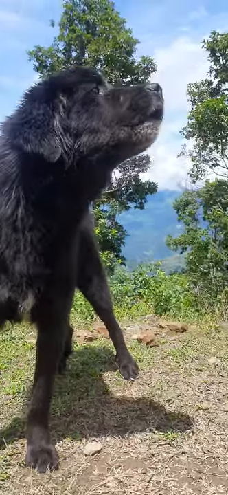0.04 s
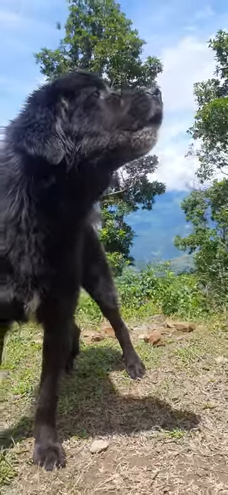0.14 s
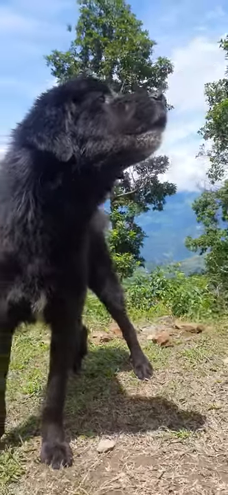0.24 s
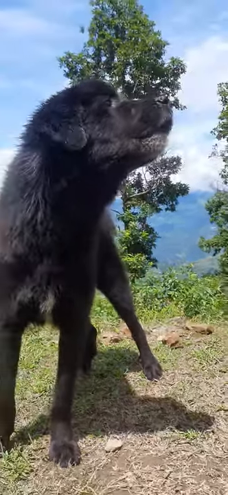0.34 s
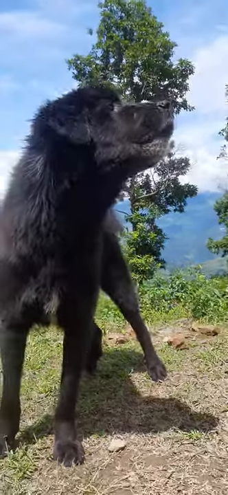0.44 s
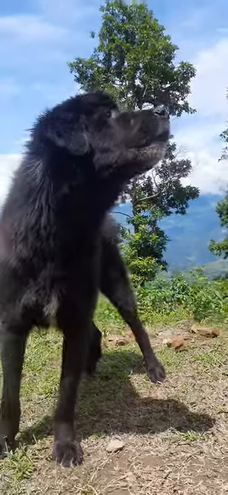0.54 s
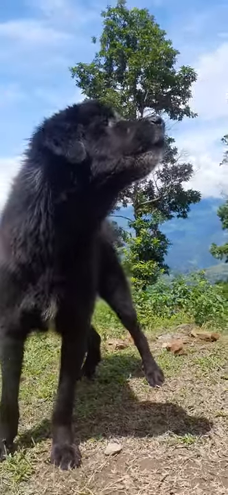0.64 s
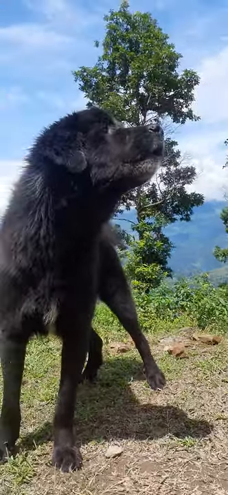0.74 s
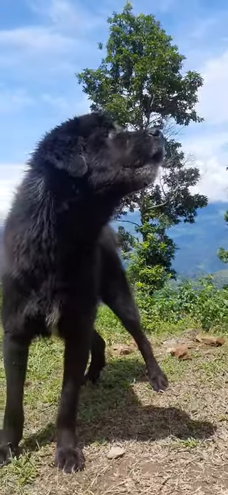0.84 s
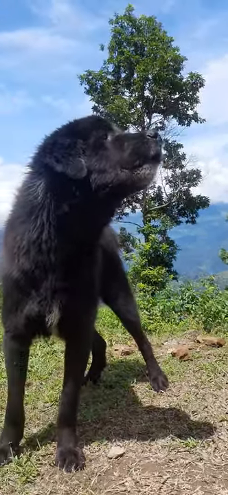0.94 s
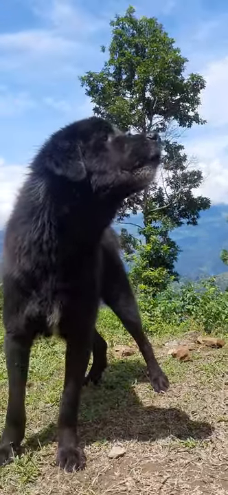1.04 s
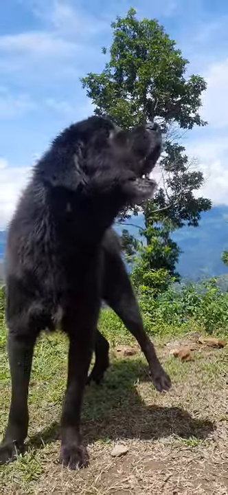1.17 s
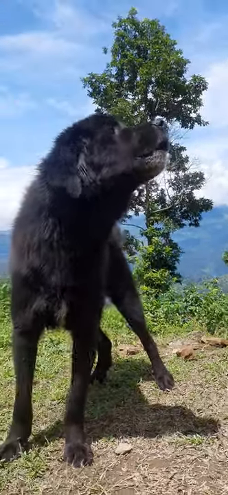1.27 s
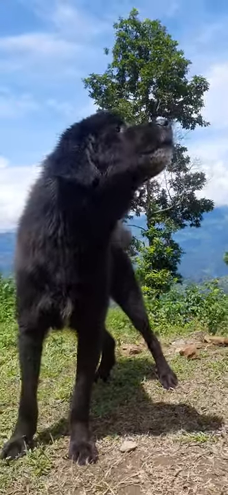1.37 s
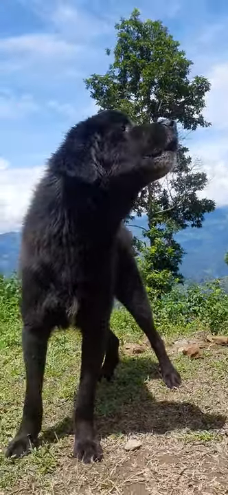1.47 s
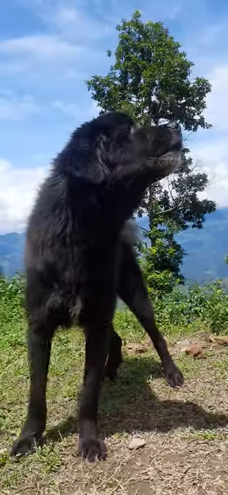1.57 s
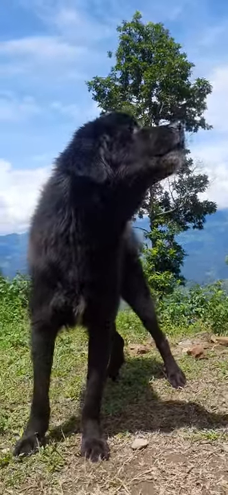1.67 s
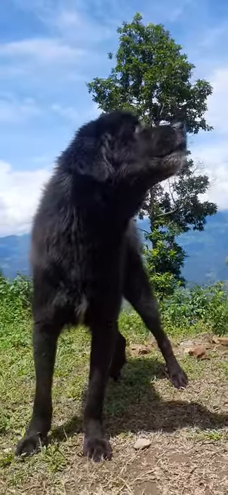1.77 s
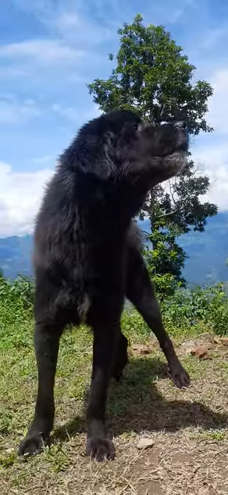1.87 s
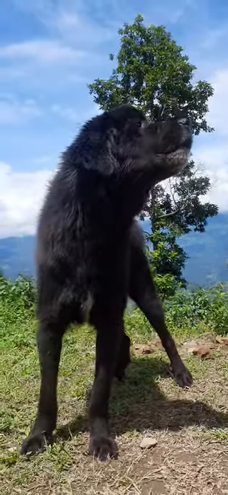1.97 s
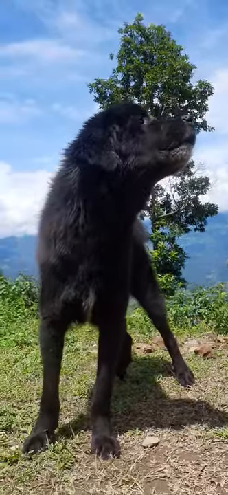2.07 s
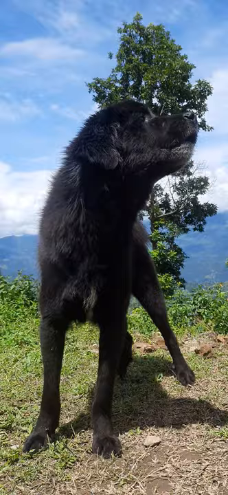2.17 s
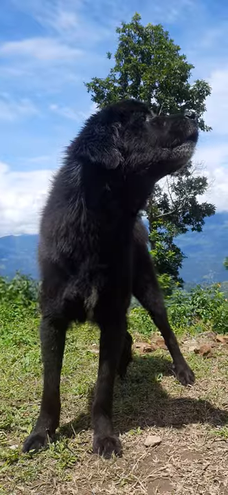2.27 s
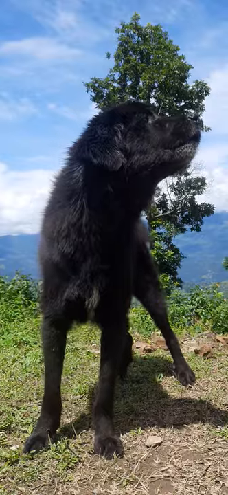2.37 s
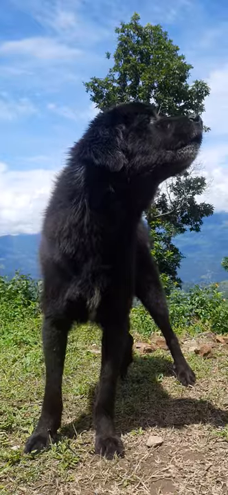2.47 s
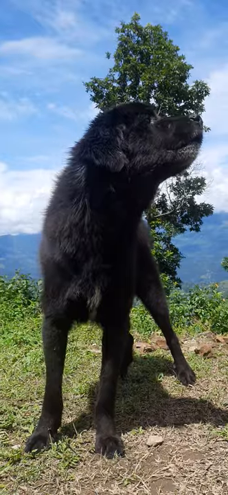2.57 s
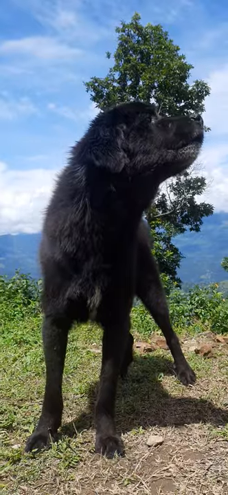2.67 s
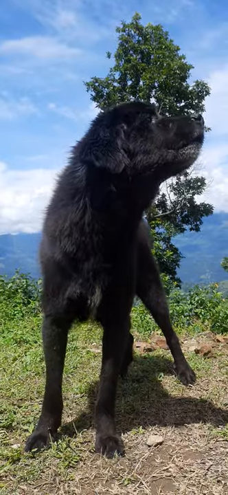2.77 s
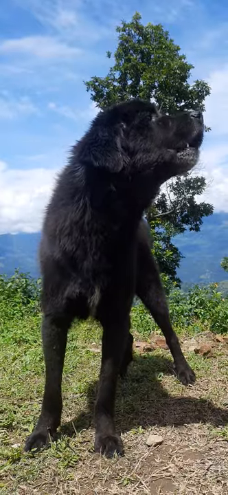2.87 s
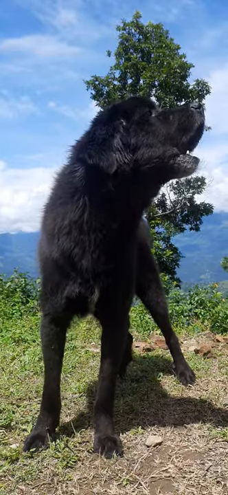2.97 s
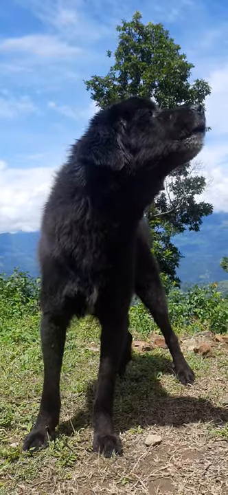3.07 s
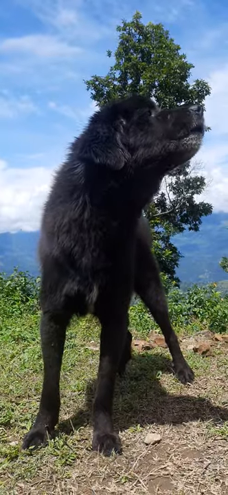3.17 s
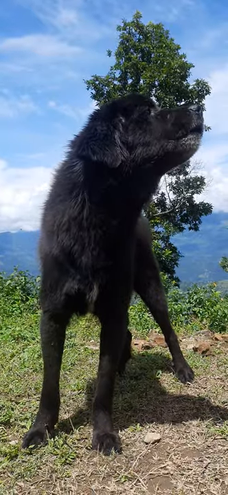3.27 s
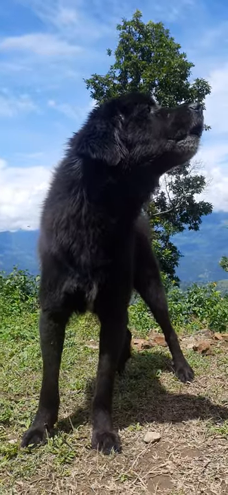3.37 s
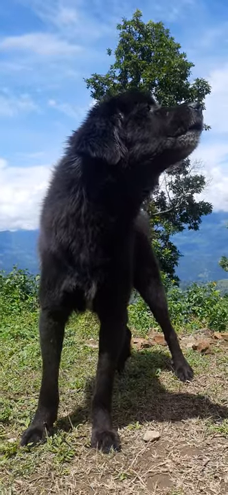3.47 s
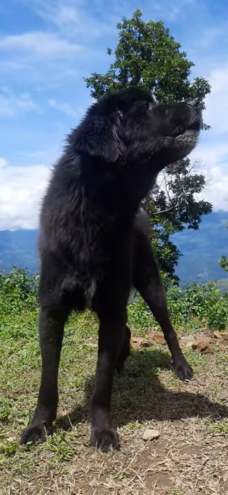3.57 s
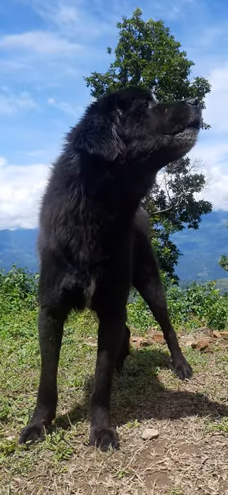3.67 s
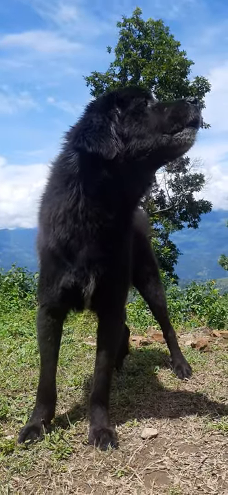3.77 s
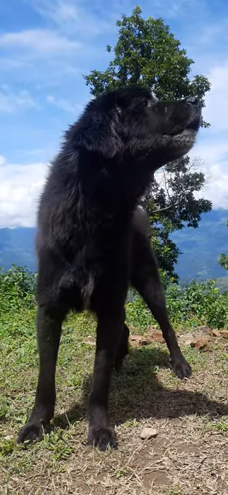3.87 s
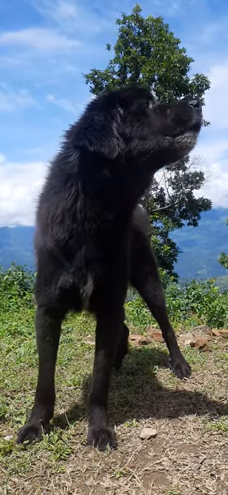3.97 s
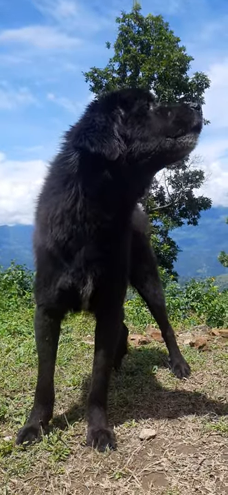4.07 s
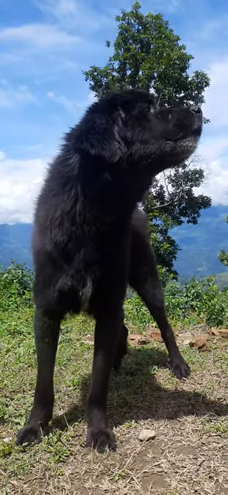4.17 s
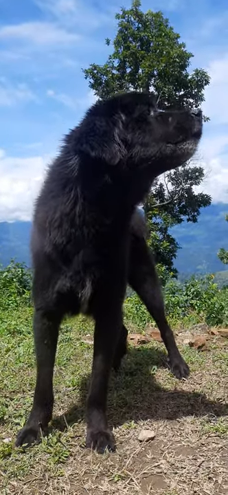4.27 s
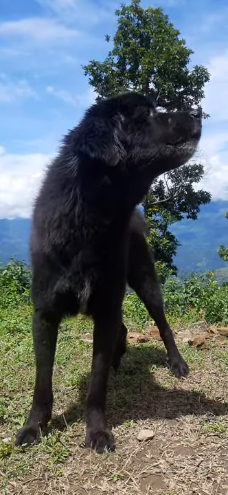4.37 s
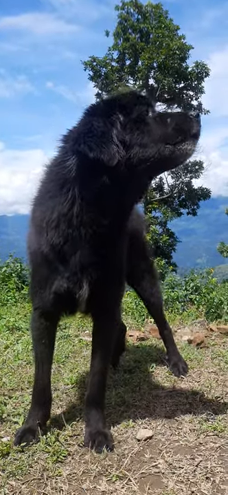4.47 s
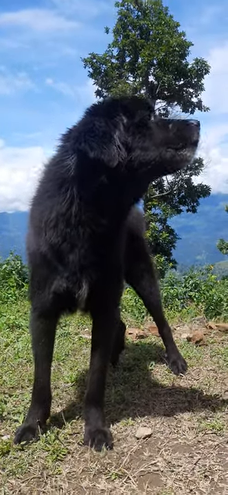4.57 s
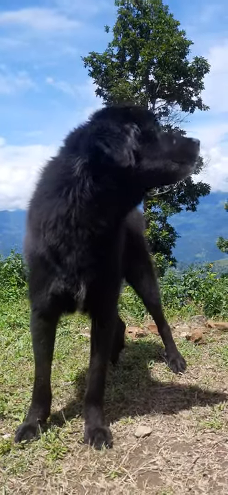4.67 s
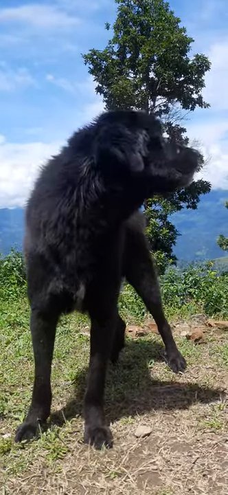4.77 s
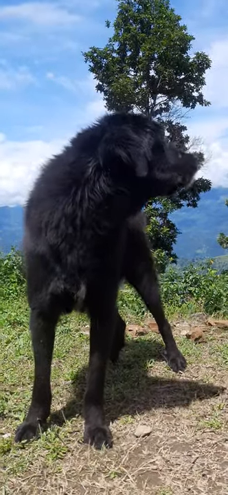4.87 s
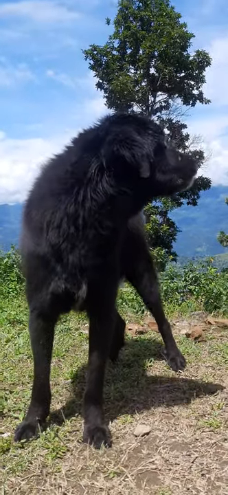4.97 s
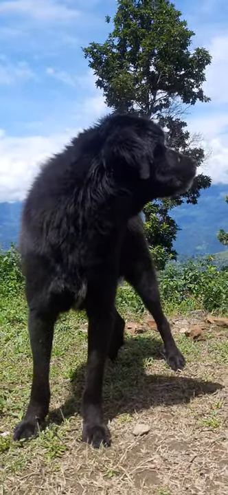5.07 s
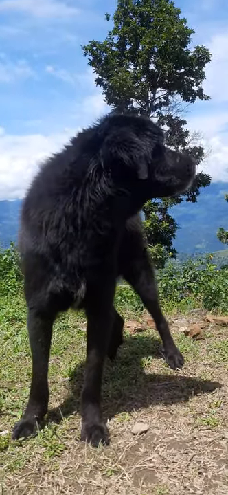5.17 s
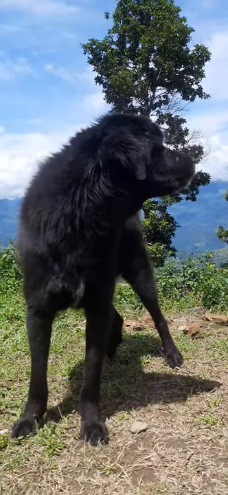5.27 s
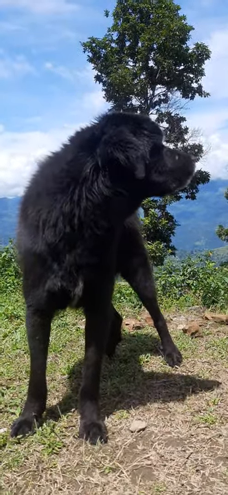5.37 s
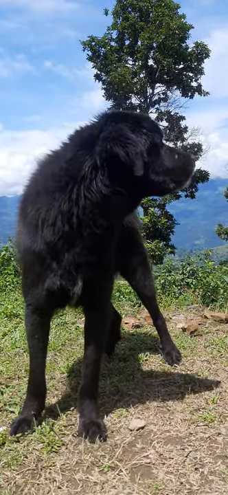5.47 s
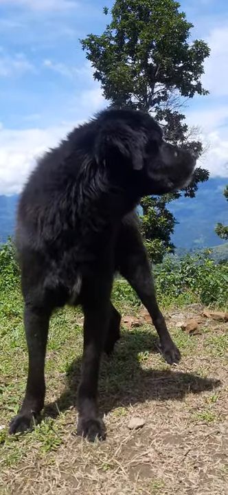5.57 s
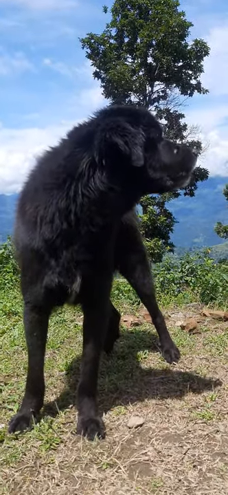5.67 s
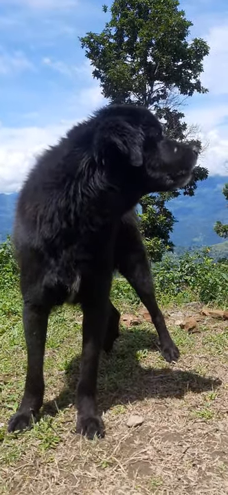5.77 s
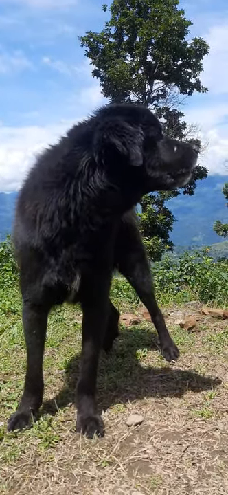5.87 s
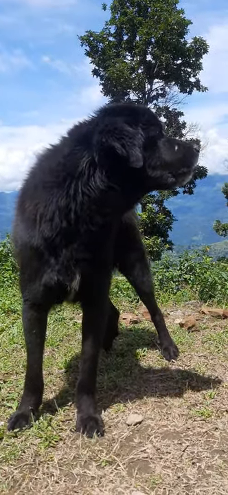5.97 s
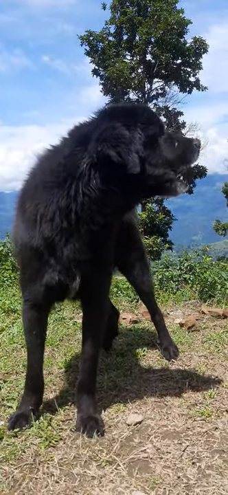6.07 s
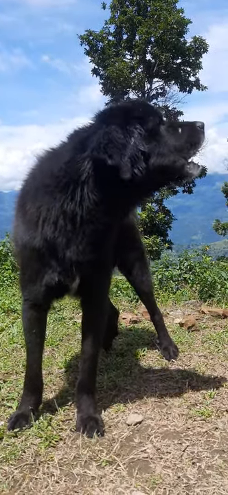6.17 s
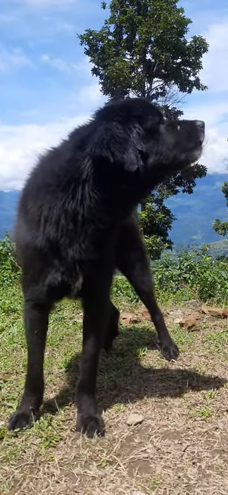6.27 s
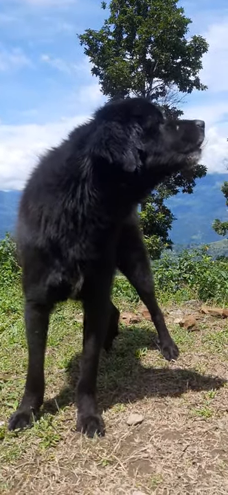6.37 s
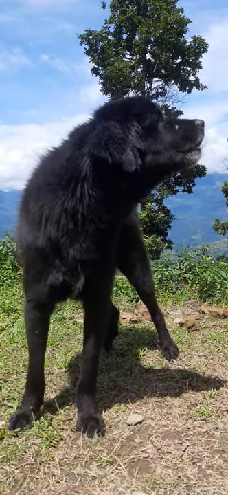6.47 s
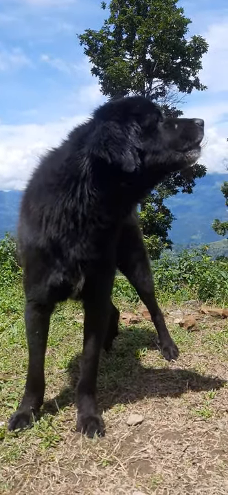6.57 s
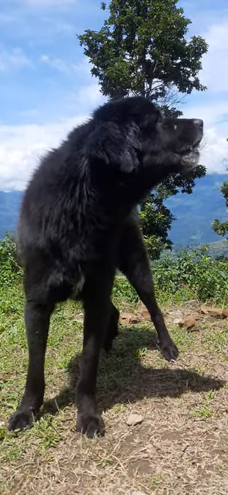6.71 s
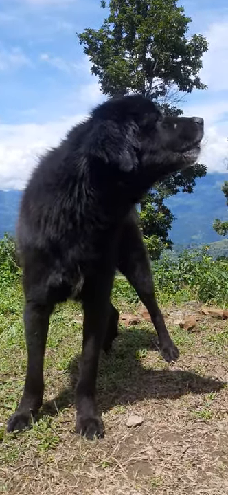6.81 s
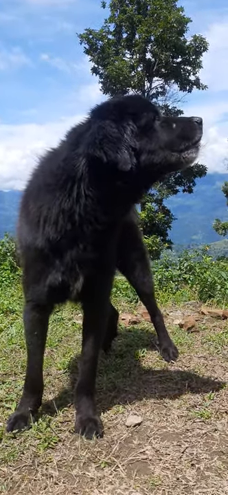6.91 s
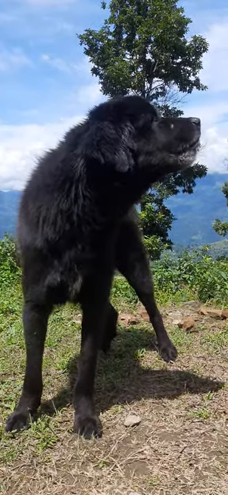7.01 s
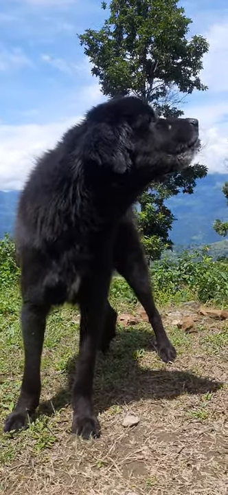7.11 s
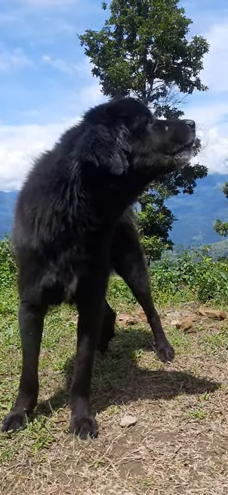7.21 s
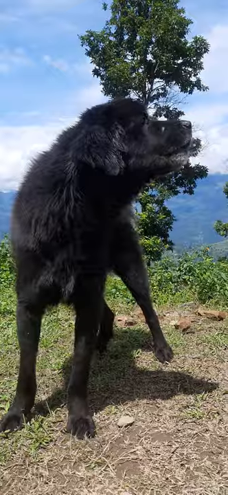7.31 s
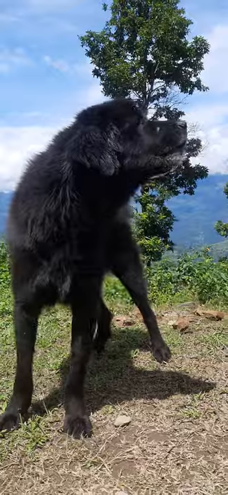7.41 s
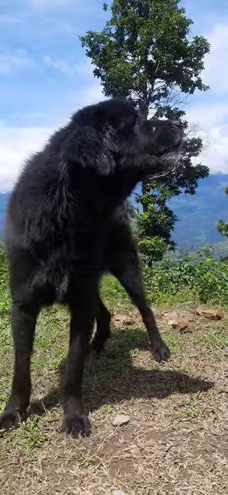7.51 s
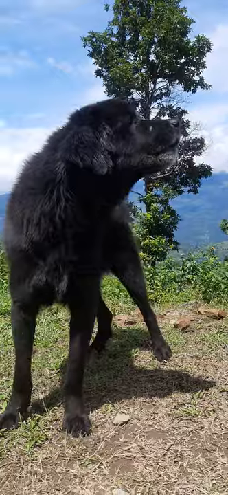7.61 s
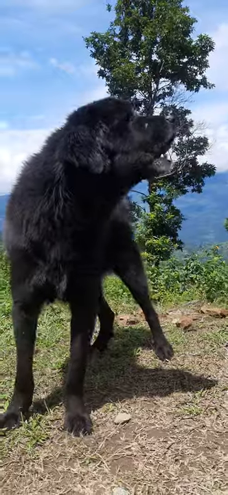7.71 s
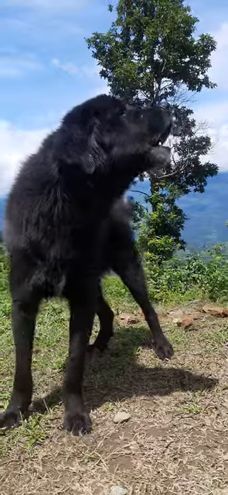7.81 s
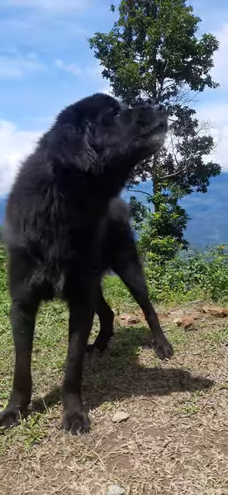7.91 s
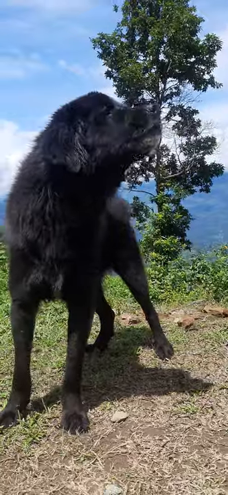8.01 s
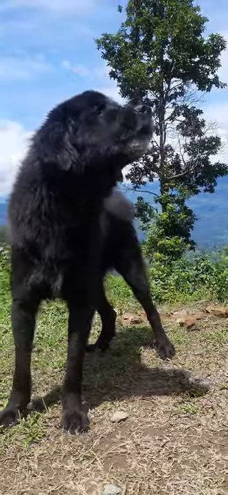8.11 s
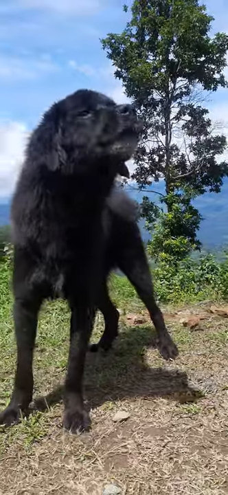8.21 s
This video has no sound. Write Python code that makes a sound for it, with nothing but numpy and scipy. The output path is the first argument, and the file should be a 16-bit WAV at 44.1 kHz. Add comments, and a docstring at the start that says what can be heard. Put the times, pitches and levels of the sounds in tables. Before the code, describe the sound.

After a low growl and soft yelp, a large dog barks hoarsely very close to the microphone, eight short barks about half a second apart. A pause of growling and small yelps follows, then five more barks with a slightly different, turned-away colour. A second, deeper dog growls almost continuously and adds four low woofs. Quiet open hillside air, little echo, stereo.

```python
"""A low growl and a soft arched yelp open the scene; then a large dog barks hoarsely, close by.
Its vocal folds give uneven pulses that chest, mouth and teeth filter; halfway, its head turns aside.
A second, deeper dog growls almost without pause, with ragged pulses and breath noise, and gives four
woofs built from arching harmonics. Further yelps fall between the barks, two barks end in a ringing
overtone, and an open hillside adds faint, decaying scatter over quiet outdoor air (filtered noise)."""
import sys
import numpy as np
from scipy import signal
from scipy.fft import rfft, irfft, next_fast_len
from scipy.io import wavfile
from scipy.ndimage import uniform_filter1d, minimum_filter1d, map_coordinates

SR = 44100
rng = np.random.default_rng(int(sys.argv[2]) if len(sys.argv) > 2 else 0)


def pcm_store(signal):
    """Save signal as 16-bit PCM."""
    levels = np.round(np.clip(np.atleast_2d(signal), -1, 1) * 32767)
    wavfile.write(sys.argv[1], SR, levels.astype(np.int16).T)


N = 363825
T = np.arange(N) / SR
BAND_TOP_HZ = 15830

# Growls of the deep dog; the chest and rasp levels hold at the settled pitch. Each row: start in seconds,
# end in seconds, first pitch in Hz, settled pitch in Hz, then chest, rasp, snarl and hiss levels in dB.
GROWLS = [ (0, 0.259, 74.35, 73.1, -49.5, -43.5, -55, -67.5),
          (0.459, 1.183, 84.03, 72.93, -51, -43, -49.5, -60),
          (1.282, 1.928, 141.2, 72.9, -50.5, -50.5, -54.5, -64.5),
          (1.998, 2.903, 122.2, 79.75, -52, -47, -57.5, -65),
          (3.042, 3.703, 138.6, 73, -54.5, -51, -58, -77), (3.956, 4.593, 100, 113, -49, -32.5, -57, -70.5),
          (4.7, 5.349, 58.86, 66.5, -53, -46.5, -56.5, -70.5),
          (5.455, 5.755, 126, 144, -56.5, -46.5, -54.5, -80),
          (6.222, 6.878, 141.3, 73.6, -54, -53.5, -58.5, -74.5),
          (7.063, 7.611, 101.7, 107, -51, -42, -56, -71.5),
          (7.864, 8.245, 128.9, 112.1, -38.5, -37, -53, -69), ]
# Deep dog's throat, nearly shut. Each row: frequency in Hz, gain in dB.
GROWL_THROAT = [(40,-51.5),(125,-4),(200,-7),(300,-9),(430,1),(560,-17),(800,-24.5),(970,-12),(1250,-37.5),(3000,-64.5)]
# Growl breath past bared teeth, as a snarl and as a hiss. Each row: frequency in Hz, gain in dB.
SNARL_SPECTRUM = [(700,-27.5),(1150,9.5),(1500,-10.5),(2000,0.5),(2300,-6),(2700,-4),(3800,-22.5),(5300,-43.5)]
LIP_HISS_SPECTRUM = [(2500,-25),(3900,-5.5),(5300,0),(9000,-5.5),(15000,-8.5)]
# Growl pitch settles exponentially; chest and rasp strengthen with pitch above the settled one.
SETTLE_S, CHEST_DB_PER_OCTAVE, RASP_DB_PER_OCTAVE, GROWL_FADE_S = 0.13, 20.5, 16, 0.027

# Still outdoor air. Each row: frequency in Hz, gain in dB.
AIR_SPECTRUM = [(25,-45.5),(110,2),(246,-13),(600,-9),(3830,-38),(15500,-47)]

# Soft yelps. Each row: crest in seconds, top pitch in Hz, crest level in dB, treble gain in dB.
YELPS = [(0.04,486.6,-36.5,28.5),(2.931,352.8,-39.5,9.5),(3.445,462,-32,10),(4.418,450,-30.5,10),(4.751,435,-30.5,-7.5),(4.999,429,-30.5,-2),(5.431,433,-30,-7.5),(6.061,414.4,-31,-3),(6.797,417.4,-25.5,-10),(7.061,401.4,-29,-9),(8.088,402.7,-28.5,-2)]
# Throat resonances of a yelp. Each row: frequency in Hz, gain in dB.
YELP_THROAT = [(200,-36.5),(340,5.5),(440,9.5),(820,-1.5),(1350,-12),(2200,-51.5)]
# At this time from its crest a yelp's pitch is divided by 1 + sag and its level is down by the drop.
YELP_HALF_S, YELP_SAG_SHARE, YELP_DROP_DB = .066, .23, 12

# Barks of the large dog. Each row: start of full voice in seconds, hold in seconds, reference pitch in Hz,
# then base levels in dB of chest tone, open mouth, rasp and hiss at the teeth.
BARKS = [(0.221, 0.086, 459.6, -17.5, -15.5, -0.5, -52), (0.643, 0.073, 460, -15, -14, 1, -49),
         (1.103, 0.088, 462, -11.5, -13.5, 6, -41), (1.538, 0.081, 460.6, -12.5, -14.5, 6, -44.5),
         (2.075, 0.09, 454.8, -11, -13.5, -1.5, -45), (2.631, 0.083, 467.5, -12.5, -14.5, 0, -43.5),
         (3.098, 0.084, 459.8, -10, -14.5, 3.5, -45), (3.566, 0.086, 460.7, -13, -17, 2, -50),
         (5.177, 0.098, 450.5, -12.5, -12, 3.5, -44), (5.93, 0.082, 447, -16, -11.5, 2.5, -46),
         (6.445, 0.074, 430.8, -16.5, -9.5, 4.7, -45), (6.906, 0.085, 441.6, -16.5, -12.5, 1.5, -48),
         (7.362, 0.096, 463.2, -14, -13.5, 4, -49.5)]
# Course of every bark. Each row: share of its length, chest tone over reference pitch, folds over
# reference pitch, pitch jitter as a share, rasp in dB, chest bloom in dB.
BARK_GESTURE = [(0.041,.8,.8,0.03465,-2,1),(0.211,.96,.94,.03,4.5,1.5),(.33,.88,.87,0.0399,0,-1),(.51,1.01,.81,0.039,-1.5,4),(0.599,1.002,.85,.05,-5,1.5),(.69,1.01,.94,.04,-4.5,1.5),(.84,1,.79,0.055,1.5,-3),(1,1,.72,.06,-5,1)]
# Barking mouth, head raised and head turned. Each row: frequency in Hz, gain in dB.
MOUTH_RAISED = [(170,-41.5),(560,-11),(660,3),(770,-6),(940,-4),(1120,-12),(1310,-7.5),(1600,-19),(1920,-23.5),(2120,-15.5),(2400,-31),(2620,-21.5),(3000,-73),(4200,-75.5)]
MOUTH_TURNED = [(190,-55.5),(560,0),(660,1),(780,-7.5),(960,-3),(1190,-24.5),(1340,-11.5),(1720,-31.5),(2120,-15),(2450,-34),(2620,-29),(3000,-50),(4200,-87)]
# Air hissing past the teeth. Each row: frequency in Hz, gain in dB.
TEETH = [(2000,-37.5),(2900,3.5),(3650,2.5),(4200,-8),(4800,0),(5500,4),(6300,-6),(6800,1.5),(7400,-13),(10000,-13.5),(15000,-6)]
# Envelopes of the parts of a bark. Each holds: lead in seconds, rise in dB per second,
# sag in dB per second, overhang in seconds, fall in dB per second.
CHEST_SHAPE = (0.015, 634, 26, 0.0046, 392)
MOUTH_SHAPE = (0.0013, 600, 16, 0.00059, 790)
HISS_SHAPE = (-.007, 430, 65, .023, 480)
# The gesture starts before the hold and stops after it; energy flutters between chest and mouth.
VOICE_MARGIN_S, FLUTTER_PER_S, FLUTTER_DB = .051, 54.5, 4
# Late in the hold the voice cracks: chest and mouth dip for an instant.
CRACK_SHARE, CRACK_S, CRACK_DB = .76, .008, 3
# Sway of the large dog from side to side. Each row: time in seconds, left minus right in dB.
SWAY = [(.2, 1.5), (3.6, 0.5), (5.2, 1), (7.4, 1.6)]
TURN_S = 4.6  # barks after this time come from the turned head

# Clear ringing overtones in two barks. Each row: crest in seconds, frequency in Hz, base level in dB.
SQUEALS = [(.722,860,-7.5),(6.531,866,-8)]

# Woofs of the deep dog. Each row: crest in seconds, top pitch in Hz, level in dB.
WOOFS = [(1.251,147.3,-10),(3.015,144.9,-13),(6.196,151.1,-12),(7.826,149.2,-10)]
# Deep dog's throat, wide open. Each row: frequency in Hz, gain in dB.
WOOF_THROAT = [(50,-54.5),(135,-23),(296,-18.5),(444,-1.5),(590,-3),(740,-10.5),(890,-8),(1040,-25.5),(1190,-20),(1335,-8.5),(1480,-25.5),(1780,-37),(2130,-23.5),(2450,-40),(3800,-57),(6200,-44),(14000,-52)]
# A woof rises to a rounded crest and dies away.
WOOF_RISE_DB_PER_S, WOOF_FALL_DB_PER_S, WOOF_CREST_S = 580, 480, .034

# Paths to the two microphones from the raised head, the turned head and the woofing dog.
# Each row: frequency in Hz, left minus right in dB, left lead in radians.
FROM_RAISED = [(326,-4,-0.35),(510,-10,0.33),(716,3.5,0.1),(930,-0.5,0.21),(1350,-6.5,0.88),(1650,-2,0.8)]
FROM_TURNED = [(330,-4,0),(447,-8.5,1.1),(595,-3,2.4),(900,-1.5,0),(1090,-12.5,1.9),(1450,4,1),(2100,-2.5,1.5)]
FROM_DEEP = [(140,-3.3,0),(260,2,-1),(430,3,-2.3),(600,-2.5,0),(785,-6,2.3),(1080,2,0),(1330,-5.5,2.5),(2100,-4,1.9)]


def amp(db):
    """Level law: decibels to an amplitude ratio."""
    return 10 ** (np.asarray(db) / 20)


def unit(x):
    """Normalization: scale to an rms of 1."""
    return x / np.sqrt(np.mean(x ** 2) + 1e-20)


def even(x, size=1100):
    """Running normalization: hold the short-term rms near 1."""
    power = uniform_filter1d(uniform_filter1d(x ** 2, size), size)
    return x / np.sqrt(np.abs(power) + 1e-12)


def along(points, hz):
    """Interpolation of a table's columns along a logarithmic frequency axis."""
    f, *cols = np.transpose(points)
    return [np.interp(np.log(hz + 1), np.log(f), c) for c in cols]


def wobble(rate, t):
    """Smooth random modulation: a spline through rate knots a second."""
    knots = (t - t[0]) * rate
    return map_coordinates(rng.standard_normal(int(knots[-1]) + 4), [knots])


def colour(x, spectrum):
    """Minimum-phase filtering: each resonance rings after its pulse, never before."""
    m = 2 * next_fast_len(len(x) // 2 + 1024, True)
    gain_db = along(spectrum, np.fft.rfftfreq(m, 1 / SR))[0]
    cepstrum = irfft(np.log(amp(gain_db)))
    # folding the cepstrum onto positive times makes the filter causal
    cepstrum[1:m // 2] *= 2
    cepstrum[m // 2 + 1:] = 0
    return irfft(rfft(x, m) * np.exp(rfft(cepstrum)), m)[:len(x)]


def lips(x, ripple_db, count=90):
    """Variable resonance: jaw and lips set new random peaks and dips each call, deepest in the treble."""
    depth_db = ripple_db * np.minimum(1, np.linspace(0, 2, count))
    hz = np.geomspace(900, BAND_TOP_HZ, count)
    return colour(x, np.column_stack([hz, depth_db * rng.standard_normal(count)]))


def place(x, path):
    """Stereo localization: level and phase differences by frequency share a voice between microphones."""
    n = x.shape[-1]
    m = next_fast_len(n + SR // 10, True)
    balance_db, lead = along(path, np.fft.rfftfreq(m, 1 / SR))
    ratio = amp(balance_db) * np.exp(1j * lead)
    shares = np.array([ratio / (1 + ratio), 1 / (1 + ratio)])
    return irfft(rfft(x, m) * 2 * shares, m)[:, :n]


def add(track, t, x):
    """Superposition: mix x into the track at its times."""
    track[..., round(t[0] * SR):][..., :len(t)] += x


def cycle(pitch, t, jitter, rate):
    """Phase as the integral of frequency, for vocal folds whose period wanders."""
    return 2 * np.pi * np.cumsum(pitch * (1 + jitter * wobble(rate, t))) / SR


def folds(phase, t, noisy, shimmer_db, count=24):
    """Glottal source: one pulse per cycle, uneven in size, with turbulence swelling at each opening."""
    half = np.sin(phase / 2)
    # closed form for a sum of count equal cosine harmonics
    pulses = np.sin((count + .5) * phase) / np.where(half == 0, 1, half) - 1
    puffs = rng.standard_normal(len(t)) * (2 + np.cos(phase))
    share = np.clip(noisy, 0, 1)
    source = np.sqrt(1 - share) * unit(pulses) + np.sqrt(share) * unit(puffs)
    return source * amp(shimmer_db * wobble(300, t))


def envelope(t, s, hold, shape):
    """Exponential growth and decay: attack, sagging hold and release as straight lines in dB."""
    lead, rise, sag, overhang, fall = shape
    since = t - s + lead
    release = fall * np.maximum(t - s - hold - overhang, 0)
    return rise * np.minimum(since, 0) - sag * np.maximum(since, 0) - release


def growls():
    """Slack-fold oscillation: chest tone and octave, ragged throat rattle, thin snarl and breath hiss."""
    out = np.zeros(N)
    for start, end, first_hz, settled_hz, chest_db, rasp_db, snarl_db, hiss_db in GROWLS:
        t = T[(T > start - .15) & (T < end + .15)]
        gate = np.exp(-np.abs(t - np.clip(t, start, end)) / GROWL_FADE_S)
        settling = np.exp(-np.maximum(t - start, 0) / SETTLE_S)
        pitch = settled_hz + (first_hz - settled_hz) * settling
        effort = np.log2(pitch / settled_hz)  # octaves
        phase = cycle(pitch * (1 + .03 * wobble(9, t)), t, jitter=.042, rate=110)
        rattle = even(colour(folds(phase, t, noisy=.54, shimmer_db=2.5), GROWL_THROAT), size=2400)
        rasp = rattle * amp(rasp_db + RASP_DB_PER_OCTAVE * effort)
        # breath turbulence pulses with the folds
        jet = rng.standard_normal(len(t)) * (2 + np.cos(phase))
        snarl = unit(lips(colour(jet, SNARL_SPECTRUM), ripple_db=7.0)) * amp(snarl_db)
        hiss = unit(lips(colour(jet, LIP_HISS_SPECTRUM), ripple_db=2)) * amp(hiss_db)
        chest = unit(np.sin(phase) + amp(-16.5) * np.sin(2 * phase))
        chest = chest * amp(chest_db + CHEST_DB_PER_OCTAVE * effort)
        heave = amp(1.8 * wobble(11, t))
        tremor = amp(2.5 * wobble(28, t))
        add(out, t, gate * (tremor * chest + heave * (rasp + snarl + hiss)))
    return place(out, [(120, -4.0, 0.19), (450, -2.5, 0.032), (900, -5.5, 0.1)])


def air():
    """Partial coherence: shared and opposed noise make a quiet background partly alike at both sides."""
    mid, side = [unit(colour(rng.standard_normal(N), AIR_SPECTRUM)) for part in range(2)]
    return amp(-48) * np.array([mid + .5 * side, mid - .5 * side])


def yelps():
    """Source and filter: soft, hoarse cries arch in pitch and level; treble gain sets their brightness."""
    out = np.zeros(N)
    for s, top_hz, db, treble_db in YELPS:
        t = T[np.abs(T - s) < .2]
        arch = ((t - s) / YELP_HALF_S) ** 2
        phase = cycle(top_hz / (1 + YELP_SAG_SHARE * arch), t, jitter=.024, rate=150)
        voice = colour(folds(phase, t, noisy=.27, shimmer_db=2), YELP_THROAT)
        voice = even(colour(voice, [(500, 0.016), (1200, treble_db)]))
        add(out, t, voice * amp(db - YELP_DROP_DB * arch))
    return out * amp([[-2], [1.6]])  # left and right


def chest_voice(t, tone_hz, torn):
    """Body resonance: a nearly pure tone joined by the low, gruff part of the fold pulses."""
    gruff = colour(torn, [(80, -44.5), (250, -19), (335, -3.0), (440, -1.5), (560, -8), (900, -59)])
    pure = unit(np.sin(cycle(tone_hz, t, jitter=.018, rate=140)))
    return even(pure + amp(-4.5) * even(gruff), size=500)


def mouth_roar(t, closing, torn, phase, flap, rasp_db, mouth):
    """Formant shift: mouth resonances sink as the jaw closes, and the second harmonic sings through."""
    wide, narrow = [lips(colour(torn, np.array(mouth) * [shift, 1]), ripple_db=4.5)
                    for shift in (1.03, .97)]
    roar = np.sqrt(1 - closing) * wide + np.sqrt(closing) * narrow
    # the hard push early in the bark brings out the upper resonances
    upper = signal.sosfiltfilt(signal.butter(2, 1400, "high", fs=SR, output="sos"), roar)
    roar = even(roar + (amp(rasp_db + 1.2 * wobble(51.1, t)) - 1) * upper, size=400)
    overtone = unit(np.sin(2 * phase) * (1 + 0.69 * flap)) * amp(2.6 * wobble(110, t))
    return amp(-1.5) * roar + amp(-5.5) * overtone


def teeth_hiss(t, torn, phase):
    """Jet turbulence: hiss pulses with the folds, comes in spurts and differs between microphones."""
    jets = torn + 1.2 * rng.standard_normal((2, len(t))) * (1 + np.cos(phase))
    hiss = np.array([even(lips(colour(side, TEETH), ripple_db=5.5)) for side in jets])
    return hiss * amp(3.66 + 2.8 * wobble(59.5, t))


def bark(s, hold, hz, chest_db, mouth_db, harsh_db, hiss_db, mouth):
    """Irregular fold vibration: uneven, flapping pulses drive chest, mouth and teeth along one gesture."""
    t = T[(T > s - .15) & (T < s + hold + .2)]
    progress = (t - s + VOICE_MARGIN_S) / (hold + 2 * VOICE_MARGIN_S)
    share, *cols = np.transpose(BARK_GESTURE)
    tone, pitch, jitter, rasp_db, bloom_db = [np.interp(progress, share, c) for c in cols]
    pitch = hz * pitch
    crack_s = s + hold * rng.normal(CRACK_SHARE, .07)
    crack_db = CRACK_DB * np.exp(-((t - crack_s) / CRACK_S) ** 2)
    flutter_db = FLUTTER_DB * np.tanh(wobble(FLUTTER_PER_S, t))
    # loose tissue flaps near a third of the pitch and sets sidebands round every line
    flap = np.cos(cycle(pitch / 3, t, jitter=0.253, rate=90))
    phase = cycle(pitch * (1 + 0.02464 * wobble(29.91, t)), t, jitter, rate=260)
    torn = folds(phase, t, noisy=.35, shimmer_db=2.2) * (1 + .35 * flap)
    closing = np.clip((t - s) / hold, 0, 1)
    chest_level_db = chest_db - 2.5 + bloom_db + envelope(t, s, hold, CHEST_SHAPE)
    chest = chest_voice(t, hz * tone, torn) * amp(chest_level_db - flutter_db - crack_db)
    mouth_level_db = mouth_db + envelope(t, s, hold, MOUTH_SHAPE)
    roar = mouth_roar(t, closing, torn, phase, flap, rasp_db + harsh_db, mouth)
    roar = roar * amp(mouth_level_db + flutter_db - crack_db)
    hiss = teeth_hiss(t, torn, phase) * amp(hiss_db + envelope(t, s, hold, HISS_SHAPE))
    return t, chest + roar + hiss


def big_dog():
    """Source directivity: colour and stereo path change with the turned head, and balance with the sway."""
    out = np.zeros((2, N))
    for row in BARKS:
        raised = row[0] < TURN_S
        mouth, path = (MOUTH_RAISED, FROM_RAISED) if raised else (MOUTH_TURNED, FROM_TURNED)
        t, voice = bark(*row, mouth)
        add(out, t, place(voice, path))
    sway_db = np.interp(T, *np.transpose(SWAY))
    return out * amp([sway_db / 2, -sway_db / 2])


def squeals():
    """Mode locking: for a moment the folds lock and one overtone rings out under a bell-shaped envelope."""
    out = np.zeros(N)
    for s, hz, db in SQUEALS:
        t = T[np.abs(T - s) < .05]
        ring = np.sin(cycle(hz, t, jitter=0.01, rate=190))
        add(out, t, ring * amp(db + 2.0) * np.exp(-((t - s) / 0.0077) ** 2))
    return out


def woofs(length=.105):
    """Harmonic synthesis: low tones arch in pitch, clearest at the crest and more ragged on either side."""
    out = np.zeros(N)
    for s, top_hz, db in WOOFS:
        t = T[np.abs(T - s) < 2 * length]
        arch = ((t - s) / (length / 2)) ** 2
        sag = arch / (1 + arch)
        phase = cycle(top_hz * (1 - .3 * sag), t, jitter=.018, rate=200)
        ragged = even(colour(folds(phase, t, noisy=.6, shimmer_db=2.2, count=30), WOOF_THROAT))
        k = np.arange(1, 60)[:, None]  # harmonic numbers
        # harmonics above the sixth weaken away from the crest
        levels_db = along(WOOF_THROAT, k * top_hz)[0] - 9 * (k > 6) * sag
        harmonics = np.sin(k * phase + 2 * np.pi * rng.random(k.shape))
        voice = even(np.sum(amp(levels_db) * harmonics, axis=0))
        slope = np.where(t < s, WOOF_RISE_DB_PER_S, WOOF_FALL_DB_PER_S)
        drop_db = slope * (np.hypot(t - s, WOOF_CREST_S) - WOOF_CREST_S)
        fundamental = np.sin(phase) * amp(-28.0 - 4.6 * arch)
        # the ragged part falls away more slowly than the clear voice
        add(out, t, voice * amp(db - drop_db) + ragged * amp(db - 8 - drop_db / 1.48) + fundamental)
    return place(out, FROM_DEEP)


def hillside(x, t60):
    """Diffuse scattering: ground and bushes answer with noise that decays by 60 dB in t60 seconds."""
    t = np.arange(SR // 2) / SR
    tail = rng.standard_normal((2, len(t))) * amp(-60 * t / t60)
    return signal.fftconvolve(x, tail / np.linalg.norm(tail[0]), axes=1)[:, :N]


def scene():
    """Superposition of the dogs, the slope's scatter and the air."""
    dogs = growls() + yelps() + big_dog() + squeals() + woofs()
    return dogs + amp(-7.5) * hillside(dogs, t60=0.14) + air()


def record(dry):
    """Gain limiting and band limiting: the loudest peaks are held, and nothing passes above the top."""
    needed = np.minimum(1, .97 / (np.abs(dry).max(axis=0) + 1e-9))
    gain = uniform_filter1d(minimum_filter1d(needed, size=260), size=260)
    m = next_fast_len(N + SR // 2)
    passband = np.fft.rfftfreq(m, 1 / SR) < BAND_TOP_HZ
    return irfft(rfft(dry * gain, m) * passband, m)[:, :N]


dry = scene()
out = record(dry)
pcm_store(out)
```